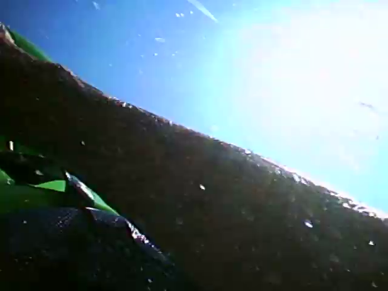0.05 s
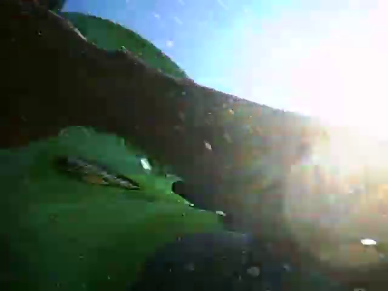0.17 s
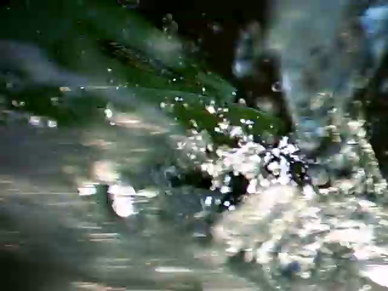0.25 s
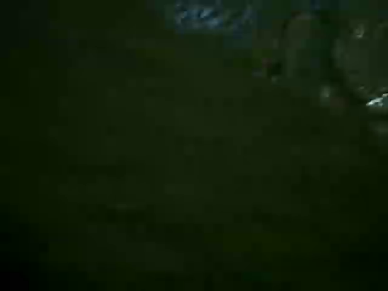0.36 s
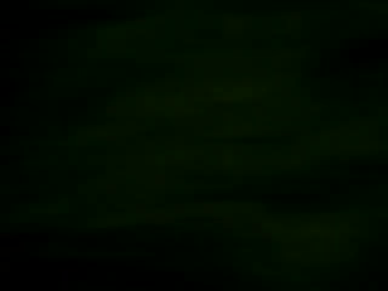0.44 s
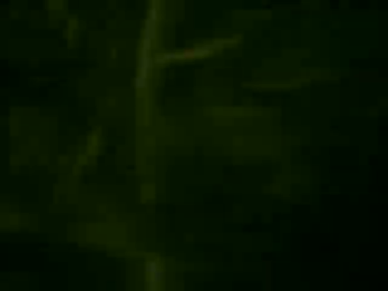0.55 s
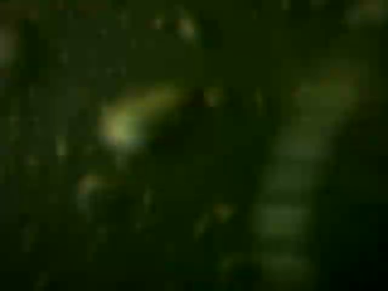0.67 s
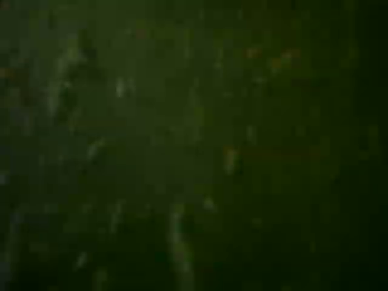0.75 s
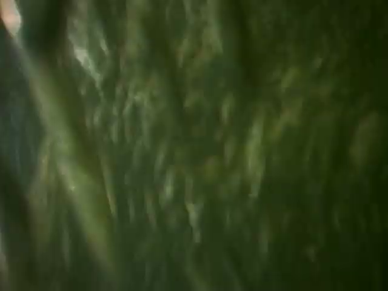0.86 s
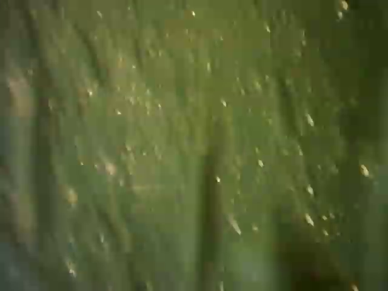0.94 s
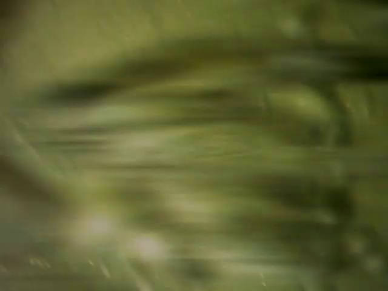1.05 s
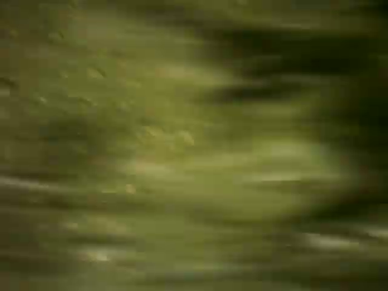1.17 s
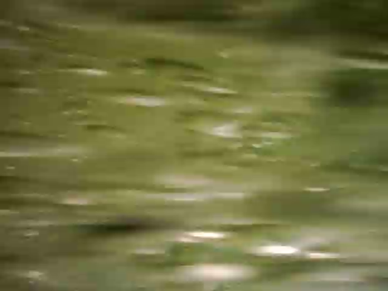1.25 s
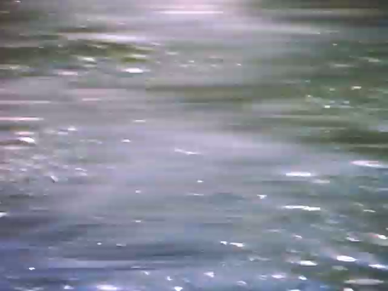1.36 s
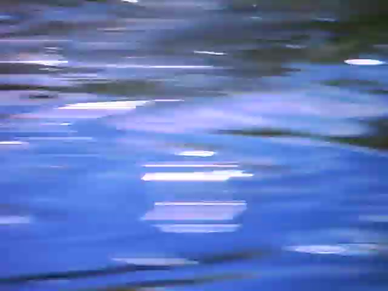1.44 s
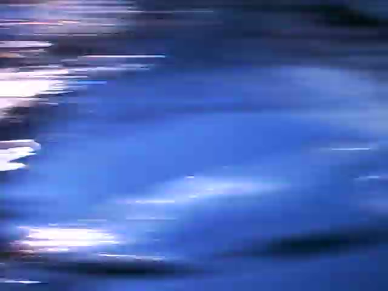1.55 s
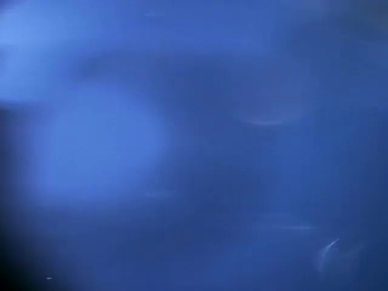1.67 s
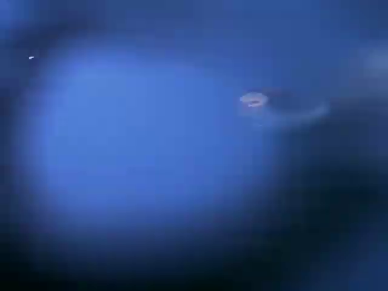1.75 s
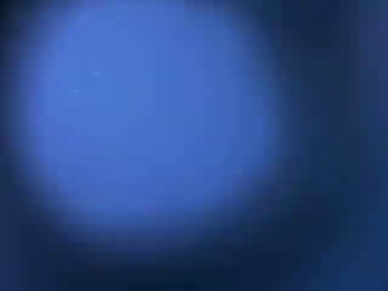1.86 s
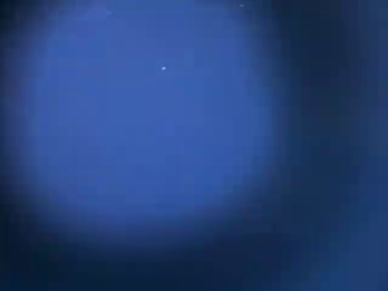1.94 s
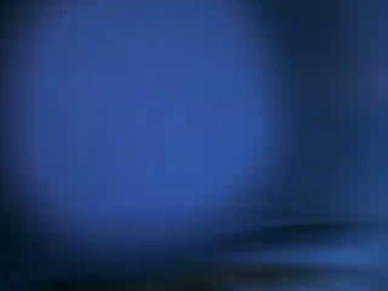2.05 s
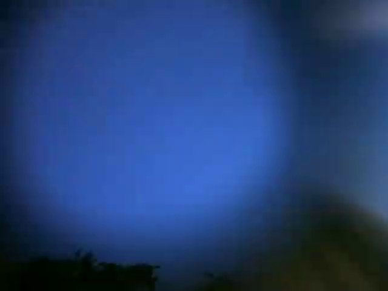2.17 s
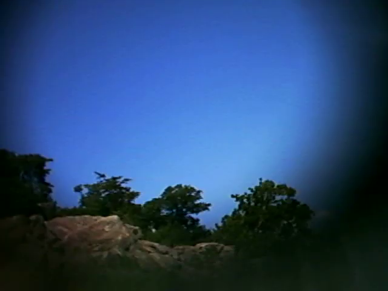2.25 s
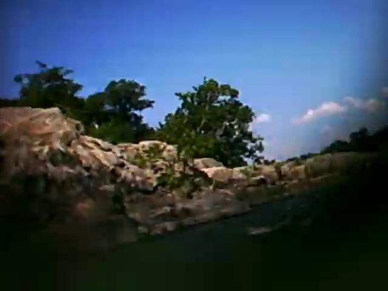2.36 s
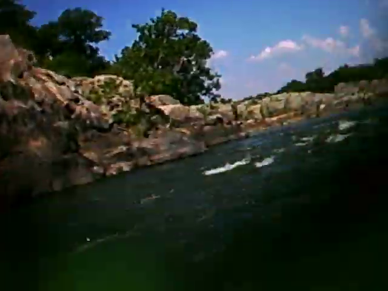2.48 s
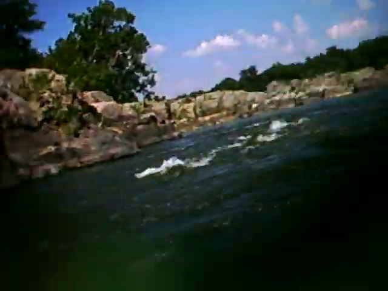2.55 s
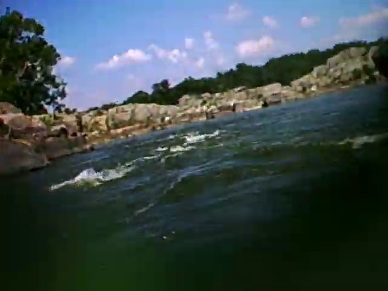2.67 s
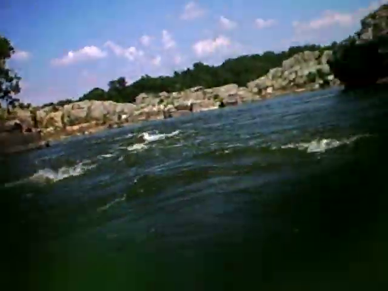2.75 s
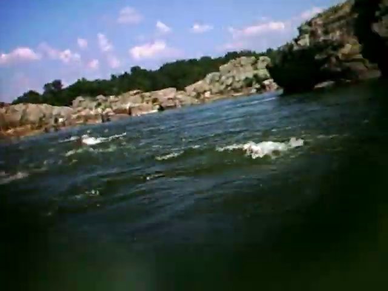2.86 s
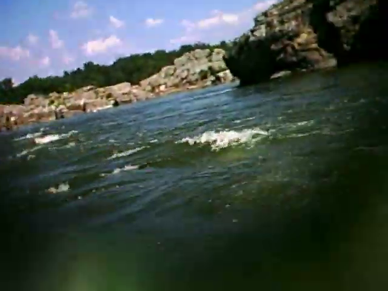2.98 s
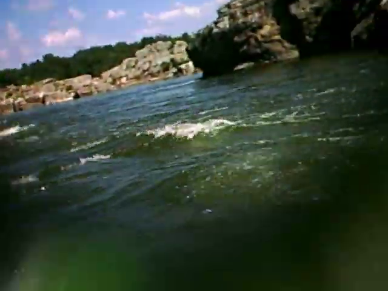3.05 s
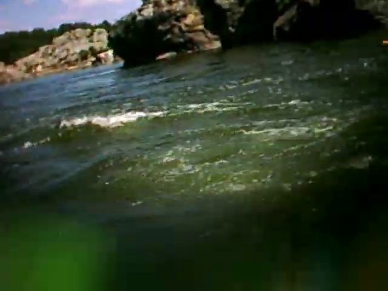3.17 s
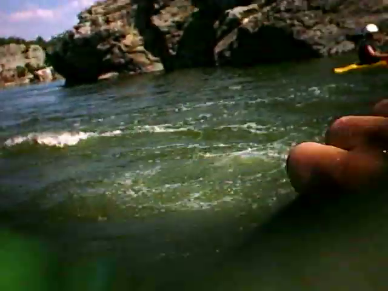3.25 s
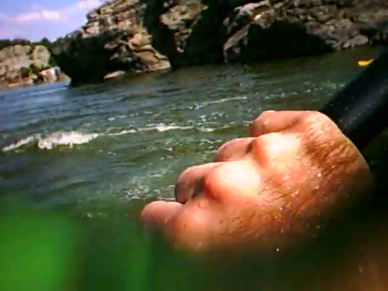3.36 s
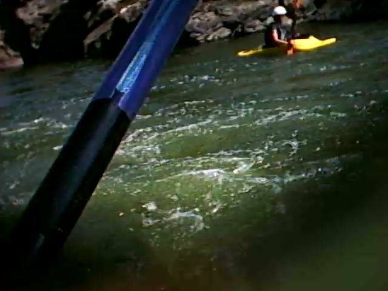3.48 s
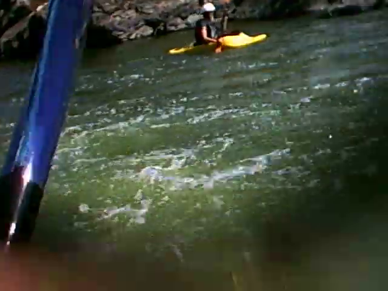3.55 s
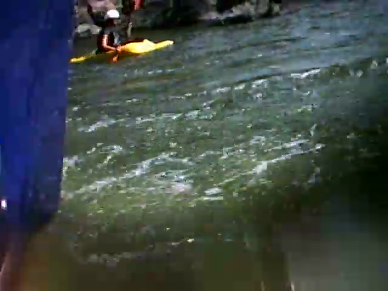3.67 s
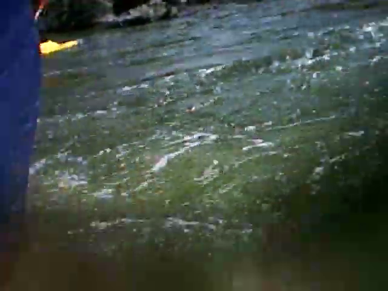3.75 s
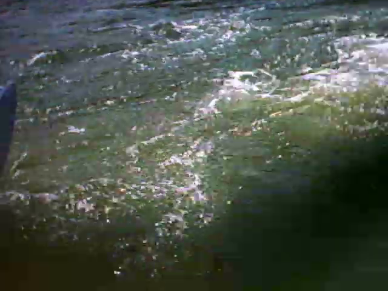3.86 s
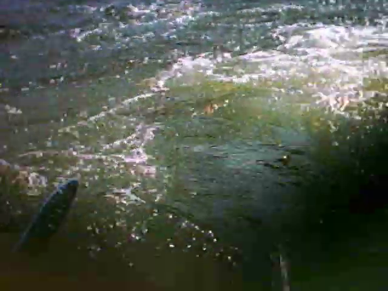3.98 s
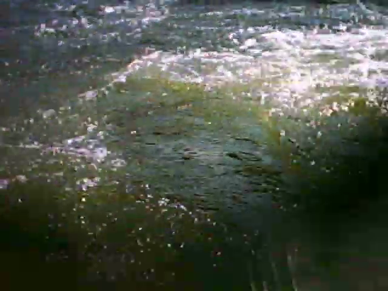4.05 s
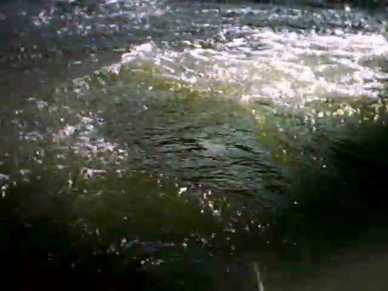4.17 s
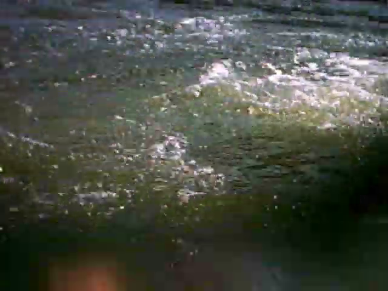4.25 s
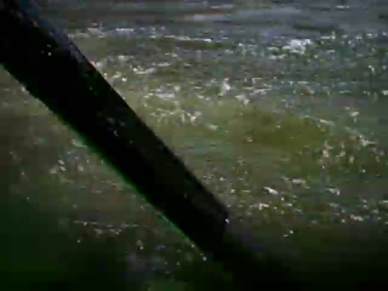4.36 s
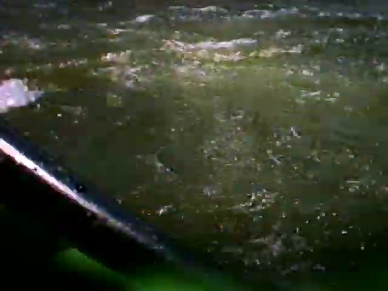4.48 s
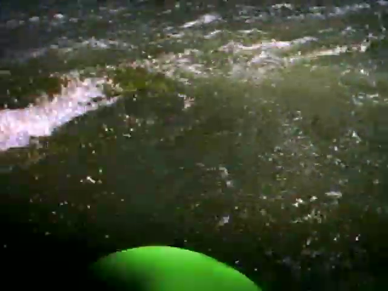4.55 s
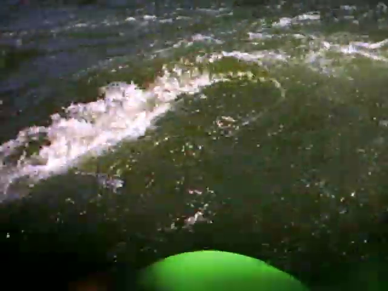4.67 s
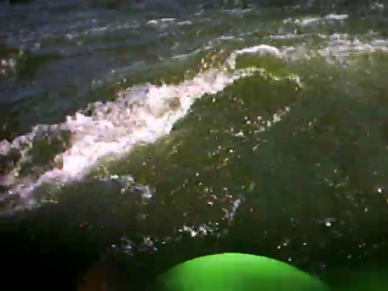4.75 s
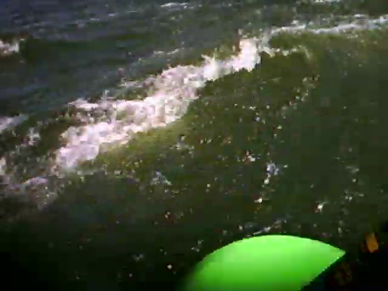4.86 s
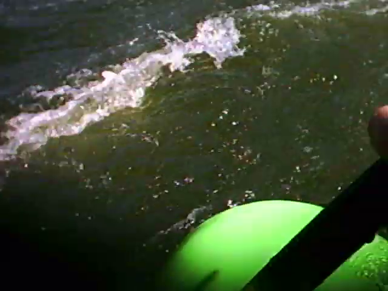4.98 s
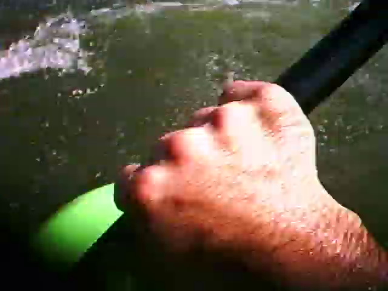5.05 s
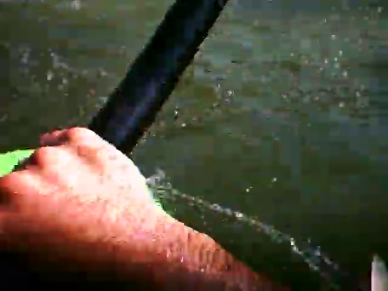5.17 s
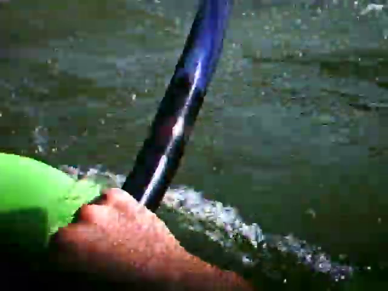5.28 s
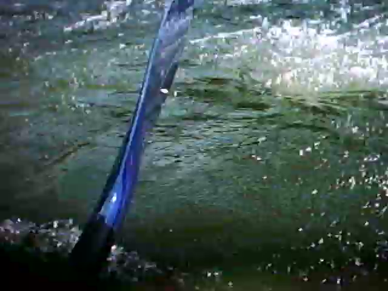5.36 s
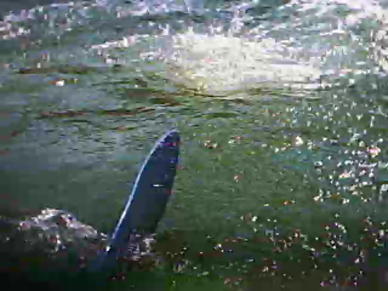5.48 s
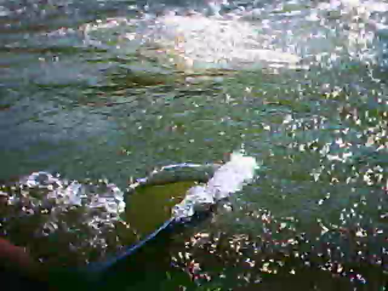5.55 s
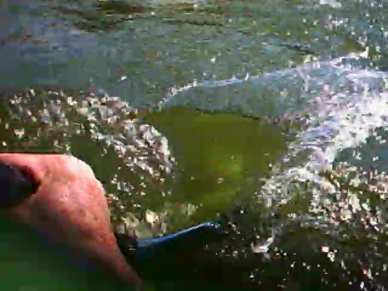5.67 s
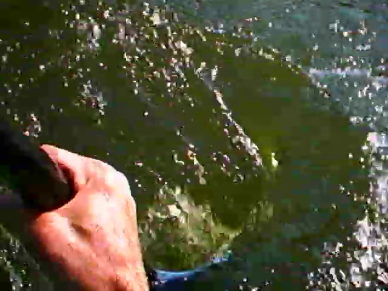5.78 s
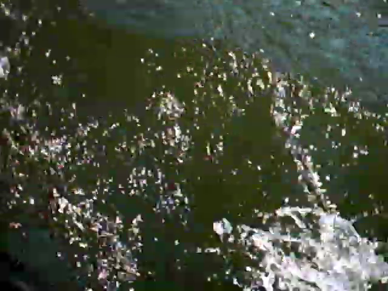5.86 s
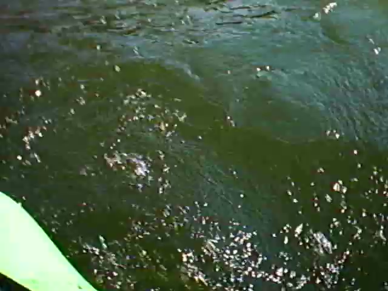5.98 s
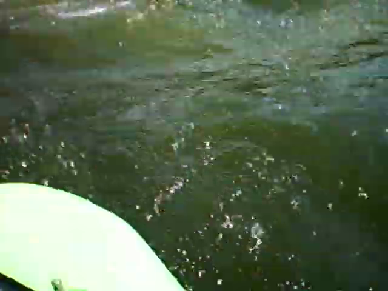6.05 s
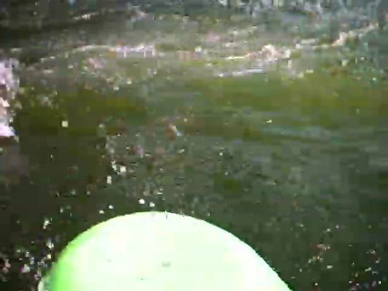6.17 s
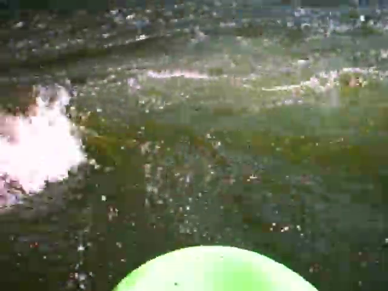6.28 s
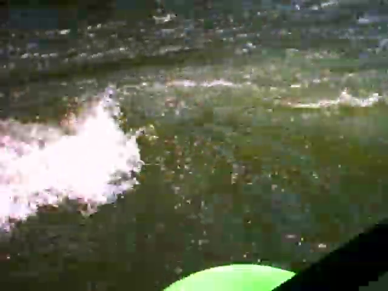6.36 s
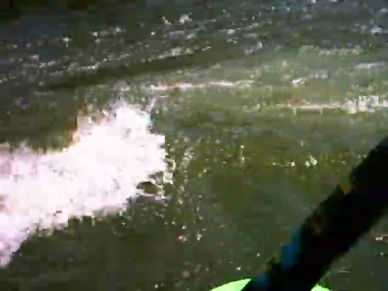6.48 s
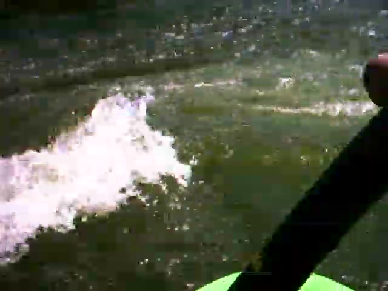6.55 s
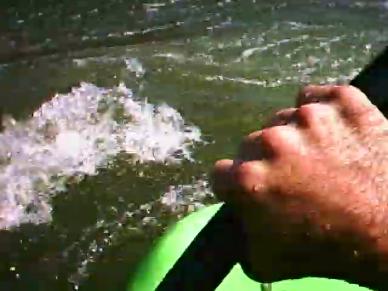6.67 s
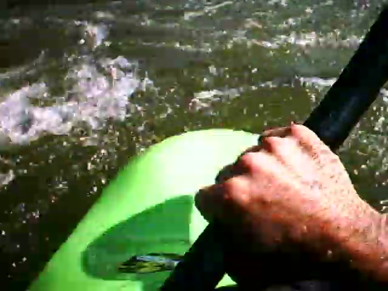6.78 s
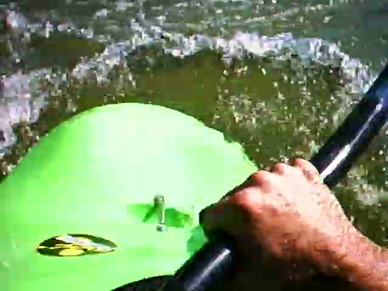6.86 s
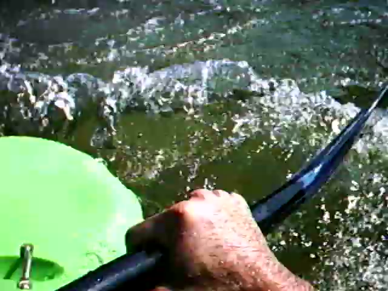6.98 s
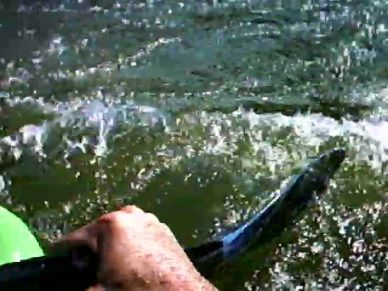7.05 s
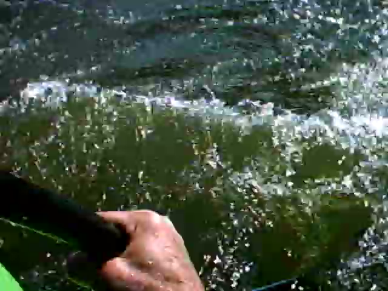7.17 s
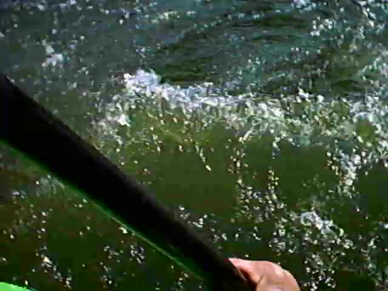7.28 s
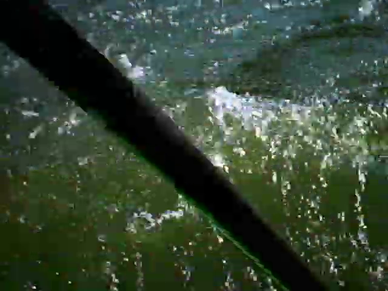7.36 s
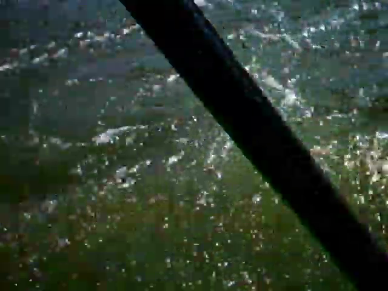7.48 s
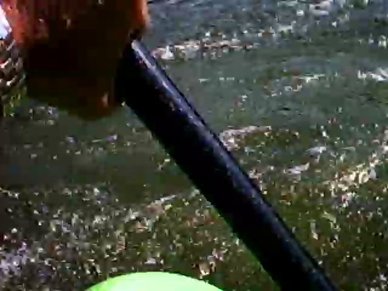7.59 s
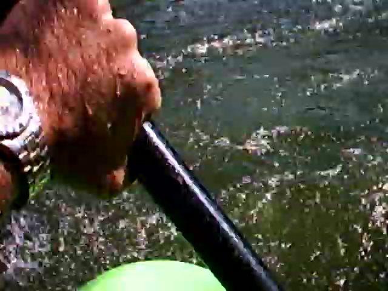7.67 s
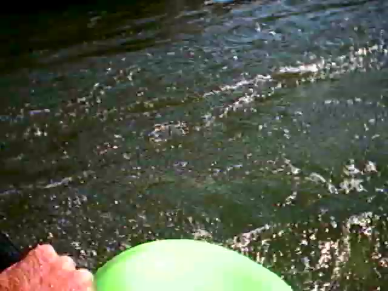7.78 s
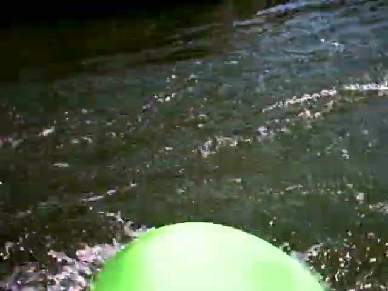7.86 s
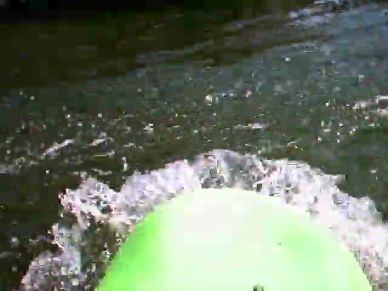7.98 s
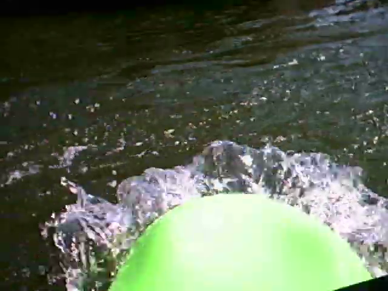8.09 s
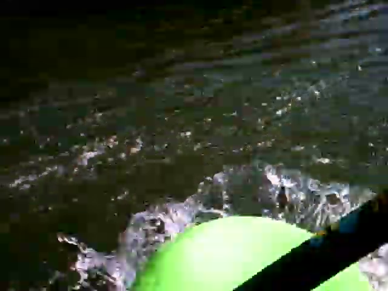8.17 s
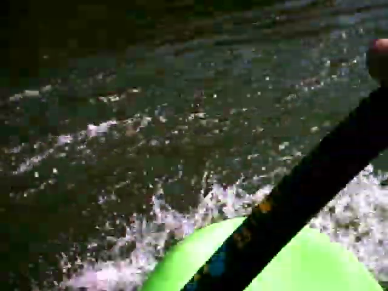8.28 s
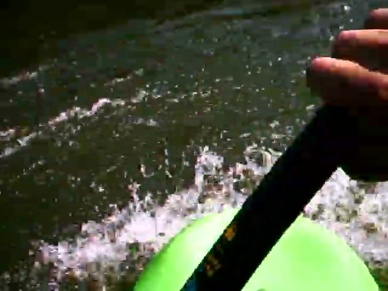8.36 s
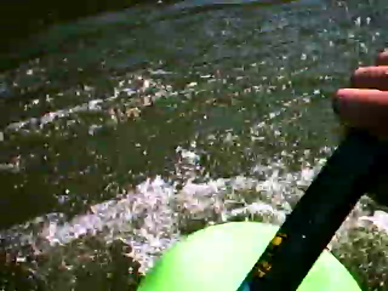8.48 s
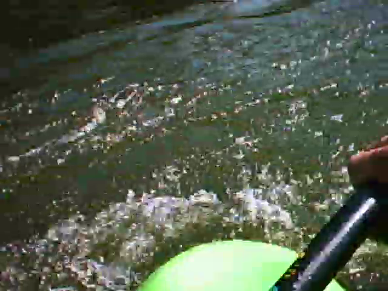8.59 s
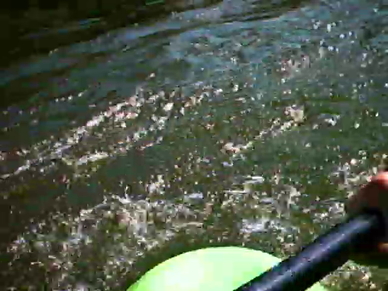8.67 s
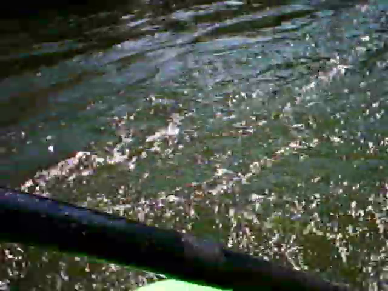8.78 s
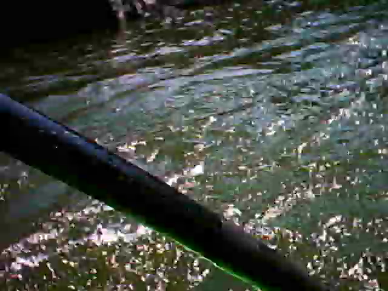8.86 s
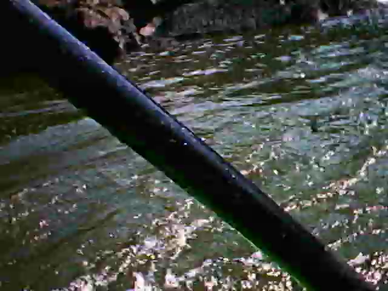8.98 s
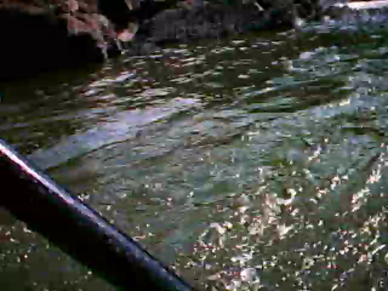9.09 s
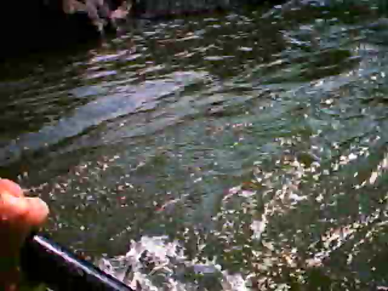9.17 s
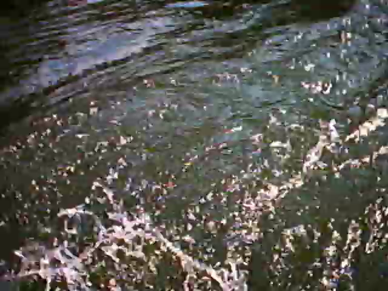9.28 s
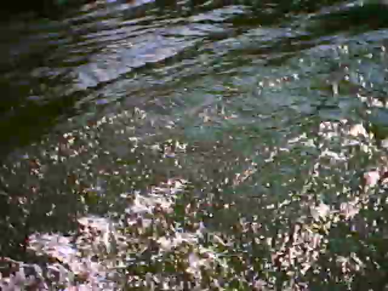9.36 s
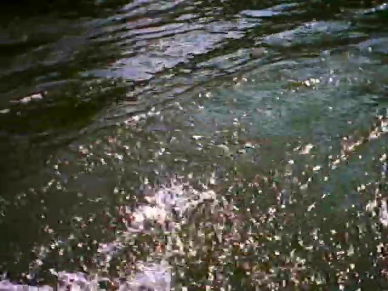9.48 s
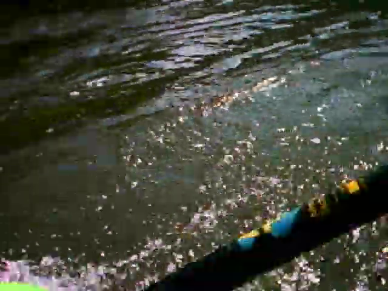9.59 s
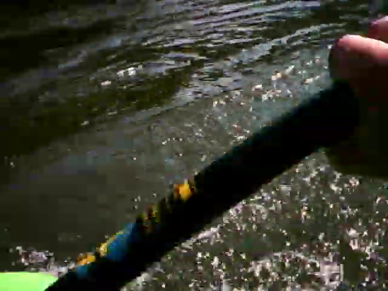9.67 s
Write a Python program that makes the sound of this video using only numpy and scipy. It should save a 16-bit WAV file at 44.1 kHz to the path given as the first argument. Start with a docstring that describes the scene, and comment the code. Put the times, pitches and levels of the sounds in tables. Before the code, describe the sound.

Overloaded underwater churning and gulping bubbles for under two seconds, a fading run-off, then faint rapids, light splashes, dull bumps and low wind.

```python
"""A river rapid, heard from a small camera in a waterproof housing on a kayak's paddler.
A wave breaks over the camera: crowds of ringing bubbles, gulping pockets and low pressure lumps overload
the narrow-band recorder. The water drains off in a fading rush. Then the river, bands of flickering noise
and bubble fizz, goes on with splashes of ringing bubbles, thumps and a drop of dying sines,
low-noise wind and a gurgle along the bow."""
import sys
import numpy as np
from scipy import signal
from scipy.io import wavfile

SR = 44100
rng = np.random.default_rng(int(sys.argv[2]) if len(sys.argv) > 2 else 0)


def master_out(mix):
    """Clip the mix to full scale and print it as 16-bit PCM to the path in sys.argv[1]."""
    frames = np.transpose(np.atleast_2d(mix))
    ceiling = np.clip(frames, -1, 1)
    pcm = np.round(ceiling * 32767).astype(np.int16)
    wavfile.write(sys.argv[1], SR, pcm)


N = 429093

# Masses of water hitting the case: the crest, the plunge, surfacing, two last slaps.
# Each row: start of full force, rise, hold and fade in seconds,
# churn level in dB, froth level in dB (both before their mix trims).
WATER_SURGES = [(.29, .065, .037, 0.32, -14, -11), (0.489, 0.18, .215, 0.57, -10, -16.5),
                (1.35, .21, .13, 0.3, -9.5, -11), (1.598, .24, 0.024, 0.061, -12.5, -13),
                (1.682, .05, 0.012, 0.08, -16.5, -16.5)]
DRAIN_S = 1.718   # water starts to run off the case


def from_db(db):
    """Decibels to gain."""
    return 10 ** (np.asarray(db) / 20)


def rms_one(x):
    """Scale to unit power."""
    return x / np.sqrt(np.mean(x ** 2) + 1e-20)


def at_hz(points, hz):
    """Read a spectrum's level in dB on a log-frequency axis."""
    table_hz, table_db = np.array(points).T
    return np.interp(np.log(hz), np.log(table_hz), table_db)


def drift(rate_hz):
    """Smooth random wander of rms 1: noise through two equal low-pass poles at the given rate."""
    step = 40   # samples between the points of the slow curve
    r = np.exp(-2 * np.pi * rate_hz * step / SR)
    noise = rng.standard_normal(N // step + 2002)
    slow = signal.lfilter([1], [1, -2 * r, r * r], noise)[2000:]   # skip the filter's start-up
    return np.interp(np.arange(N) / step, np.arange(len(slow)), rms_one(slow))


def surge(s, rise, hold, fade):
    """Attack, hold, release as a gain; rise and fade are the seconds taken for 20 dB."""
    t = np.arange(N) / SR - s
    before = np.maximum(-t / rise, 0)
    after = np.maximum((t - hold) / fade, 0)
    return from_db(-20 * np.minimum(before + after, 10))


def swells(rows, steady_db=-120):
    """Bell-shaped swells add their power to a steady level; a gain per sample."""
    t = np.arange(N) / SR
    power = from_db(steady_db) ** 2
    for s, db, width in rows:
        power = power + from_db(db) ** 2 / (1 + ((t - s) / width) ** 2 / 2) ** 4
    return np.sqrt(power)


def add(out, s, sound):
    """Mix a short sound in at a time in seconds."""
    start = max(round(s * SR), 0)
    out[start:start + len(sound)] += sound[:N - start]


def ping(hz, t60, glide=0.0, swell=0.0):
    """A dying sine; it builds up over `swell` cycles, and its pitch rises by the share `glide` in t60."""
    t = np.arange(int(1.5 * t60 * SR)) / SR
    onset = 1 - np.exp(-t * hz / max(swell, 1e-3))
    decay = from_db(-60 * t / t60)
    cycles = hz * t * (1 + glide * t / t60 / 2)
    return onset * decay * np.sin(2 * np.pi * cycles)


def turbulence(spectrum, patchy_db, flicker, count):
    """Bands of noise, each flickering on its own at about `flicker` Hz; rms 1."""
    edges = np.geomspace(spectrum[0][0], spectrum[-1][0], count + 1)
    white, out = rng.standard_normal((2, N)), 0
    for k, (low, high) in enumerate(zip(edges, edges[1:])):
        band_pass = signal.butter(2, [low, high], "band", fs=SR, output="sos")
        band = signal.sosfilt(band_pass, white[k % 2])   # neighbouring bands use separate noises
        level_db = at_hz(spectrum, np.sqrt(low * high)) + patchy_db * drift(flicker)
        out = out + band * from_db(level_db)
    return rms_one(out)


def bubbles(spectrum, per_s, cycles, spread_db, count):
    """Random-sized bubbles excite resonators that die 60 dB in `cycles`; power holds steady at any rate."""
    out, odds = 0, np.broadcast_to(per_s / count / SR, N)
    for hz in np.geomspace(spectrum[0][0], spectrum[-1][0], count):
        draw = rng.random(N) / odds
        born = np.flatnonzero(draw < 1)
        size = from_db(spread_db * np.minimum(-np.log(draw[born]), 3))
        kicks = np.full(N, 1e-18)
        kicks[born] = size * (-1) ** born / np.sqrt(odds[born])   # rarer bubbles ring louder
        r, w = from_db(-60 * hz / (cycles * SR)), 2 * np.pi * hz / SR
        rings = signal.lfilter([1, 0, -1], [1, -2 * r * np.cos(w), r * r], kicks)
        out = out + rms_one(rings) * np.sqrt(hz) * from_db(at_hz(spectrum, hz))
    return rms_one(out)


def housing(x):
    """The closed plastic case colours sound passing through it with resonant peaks and dips."""
    # Each row: centre in Hz, nominal width in Hz, boost or cut in dB.
    resonances = [(412, 90, 2), (675, 50, 4), (1057, 69, 9.5), (1430, 220, 3), (1670, 140, -2.5),
                  (1900, 400, -6), (2250, 110, 2.5)]
    for hz, width_hz, db in resonances:
        b, a = signal.iirpeak(hz, hz / (width_hz * from_db(-db / 2)), fs=SR)
        x = x + (from_db(db) - 1) * signal.lfilter(b, a, x)
    return x


def river():
    """A noise rush and bubble fizz; whitecaps and the run-off swell all but the steady bass."""
    # Spectrum of the rapid. Each row: frequency in Hz, relative level in dB per Hz.
    rush_spectrum = [(55, 2.5), (110, 2), (200, -2), (330, -5), (480, -2), (750, -4), (1200, 0),
                     (2000, 0.5), (3000, -2.5), (3500, -3), (4200, -7.5)]
    # Whitecaps passing the boat. Each row: nearest moment in seconds, level in dB, half width in seconds.
    whitecaps = [(.2, -40.5, .2), (2.75, -60.5, 0.13), (4.7, -59.5, .15), (5.35, -56, 0.56),
                 (6.1, -64, 0.28), (6.53, -57, .08), (7.05, -55.5, 0.087), (7.8, -60, 0.074),
                 (8.55, -56, 0.35), (8.89, -53.5, 0.058), (9.55, -54.5, 0.55)]
    river_db, bass_db, bass_top_hz = -58, -57, 230
    drain_db, drain_hold_s, drain_fade_s = -39.5, .067, .59
    rush = turbulence(rush_spectrum, patchy_db=1.2, flicker=9, count=13)
    fizz = bubbles(rush_spectrum, per_s=1300, cycles=8.7, spread_db=6.5, count=24)
    water = from_db(-1.0) * rush + from_db(-6.0) * fizz
    bass = signal.sosfilt(signal.butter(1, bass_top_hz, fs=SR, output="sos"), water)
    run_off = from_db(drain_db) * surge(DRAIN_S, rise=.037, hold=drain_hold_s, fade=drain_fade_s)
    level = np.hypot(swells(whitecaps, river_db), run_off)
    lapping = from_db(.4 * drift(5))
    return lapping * (level * (water - bass) + from_db(bass_db) * bass)


def wind():
    """Low, lumpy pressure of air on the case: flickering noise under a steady breeze with gusts."""
    # Each row: frequency in Hz, relative level in dB per Hz ahead of the low-pass.
    gust_spectrum = [(18, 10), (32, -0.5), (50, -12.5), (80, -19), (130, -25.5)]
    # Each row: peak time in seconds, level in dB, half width in seconds.
    gusts = [(2.4, -52, 0.087), (3.75, -55.5, 0.52), (4.4, -51.5, .06), (5.2, -50, .16), (6.1, -50.5, .08),
             (6.85, -51.5, 0.15), (7.8, -57, 0.72), (9.13, -52, 0.18)]
    breeze_db = -62.5
    air = turbulence(gust_spectrum, patchy_db=-0.5, flicker=6.5, count=4)
    lumps = signal.sosfilt(signal.butter(2, 75, fs=SR, output="sos"), air)
    return swells(gusts, breeze_db) * lumps


def hull():
    """Water gurgles along the hollow bow as it pushes through a wave: low ringing bubbles in swells."""
    # Each row: frequency in Hz, relative level in dB per Hz.
    gurgle_spectrum = [(180, -3.5), (260, 1), (370, -6)]
    # Each row: peak time in seconds, level in dB, half width in seconds.
    bow_wave = [(8.49, -63, .06), (8.72, -63, 0.083)]
    return swells(bow_wave) * bubbles(gurgle_spectrum, per_s=250, cycles=20, spread_db=0.5, count=10)


def splashes():
    """Paddle blade and bow throw up clouds of bubbles that swell quickly and die away."""
    # Each row: start in seconds, level in dB before the mix trim, length in seconds (peak at a third).
    splash_rows = [(0.044, -30.5, 0.029), (5.42, -47, 0.013), (5.732, -44, 0.023), (5.793, -42, .017),
                   (5.876, -47, 0.028), (5.918, -46, 0.02), (5.968, -53, 0.093), (6.908, -53, 0.14),
                   (7.048, -54, 0.078), (7.759, -56, .03), (7.97, -51, .02), (8.273, -52.5, 0.016),
                   (8.345, -53, 0.028), (8.871, -53, 0.026), (8.963, -49.5, .018), (9.291, -51, 0.07)]
    # Each row: frequency in Hz, relative level in dB per Hz.
    splash_spectrum = [(250, -3.5), (450, -3), (700, 0), (1150, 5), (1700, -6), (3500, -11)]
    t, cloud = np.arange(SR) / SR, np.zeros(N)
    for s, db, length in splash_rows:
        age = 3 * t / length
        add(cloud, s, from_db(db) * age * np.exp(1 - age))
    spray = bubbles(splash_spectrum, per_s=600, cycles=67, spread_db=4.0, count=22)
    return from_db(-5.0) * cloud * spray


def knocks():
    """Dull bumps of water, boat and paddle are low dying sines; a drop rings the case's own modes."""
    # Each row: start in seconds, level in dB, pitch in Hz, time to fall 60 dB in seconds.
    thumps = [(0.043, -27.5, 118, 0.07), (0.035, -29.5, 34, 0.48), (1.7, -11, 48.4, 0.098),
              (1.903, -39.5, 162.5, 0.19), (2.377, -38.5, 45.54, 0.31), (3.199, -44, 120.8, 0.1),
              (4.355, -40.5, 91.8, 0.065), (5.806, -20.5, 25.6, 0.16), (5.803, -35, 69, 0.11),
              (5.916, -41.5, 96, 0.053), (6.98, -46, 77.6, .18)]
    # A drop hits the case: start in seconds, level in dB.
    drop_s, drop_db = (2.4285, -32.5)
    # Ringing modes of the case. Each row: pitch in Hz, level in dB relative to the drop,
    # time to fall 60 dB in seconds.
    shell_modes = [(687, -9, 0.075), (1060, 7.5, 0.028), (1240, 10.5, 0.013), (1464, -24, .018),
                   (2160, -4.5, 0.015)]
    out = np.zeros(N)
    for s, db, hz, t60 in thumps:
        add(out, s, from_db(db) * ping(hz, t60, swell=0.22))
    for hz, db, t60 in shell_modes:
        add(out, drop_s, from_db(drop_db + db) * ping(hz, t60, swell=0.54))
    return out


def small_gulps():
    """Lesser air pockets ring at random from the first surge to the last, each for as many cycles."""
    per_s, cycles = 16, 30
    mean_db, spread_db, low_hz, high_hz = -23.5, 3.5, 650, 3500
    first, last = WATER_SURGES[0][0], WATER_SURGES[-1][0]
    out = np.zeros(N)
    for when, pitch, size in rng.random((int(per_s * (last - first)), 3)):
        hz = low_hz * (high_hz / low_hz) ** pitch
        db = mean_db + spread_db * (2 * size - 1)
        add(out, first + when * (last - first), from_db(db) * ping(hz, cycles / hz, glide=.1, swell=.7))
    return out


def gulps():
    """A large air pocket pinches off and rings against the case; three smaller pieces ring around it."""
    # Each row: start in seconds, level in dB, pitch in Hz, time to fall 60 dB in seconds.
    pockets = [(.266, -11.5, 3000, .007), (.316, -6.5, 2150, 0.03), (0.348, 4.5, 1524, .016),
               (0.47, 1.5, 1164, 0.031), (0.494, -3, 1360, 0.058), (.504, -3, 2395, .043),
               (.669, -6.5, 935, 0.042), (.695, -10, 885, 0.13), (.708, 4.5, 670, 0.044),
               (.754, -4.5, 1550, 0.016), (.786, -3, 630, 0.079), (.811, -10, 2705, .021),
               (0.849, 0.5, 1555, 0.035), (0.872, -11, 1253, .13), (.892, 2, 937, .06),
               (0.92, 3, 1205, 0.038), (.947, 0.5, 700, 0.023), (.988, 3.5, 826, 0.057),
               (1.056, -21, 1380, 0.06), (1.097, -10, 2204, 0.026), (1.101, -3.5, 935, 0.042),
               (1.154, -0.5, 2803, 0.0087), (1.173, 3, 1330, 0.014), (1.187, -4.5, 3620, 0.0062),
               (1.216, 0, 730, 0.018), (1.216, -8, 2390, 0.013), (1.267, -4.5, 640, 0.077),
               (1.281, -8, 3520, .02), (1.296, -4, 1323, .06), (1.597, -3.5, 1386, 0.081),
               (1.62, 0, 1300, .03), (1.671, 6, 1795, .008), (1.691, -2.5, 2720, 0.0096),
               (1.696, -10, 650, 0.057), (1.706, 4, 1105, 0.014), (1.838, -24.5, 377, .055)]
    out = np.zeros(N)
    pieces = rng.random((len(pockets), 3, 2))
    for (s, db, hz, t60), draws in zip(pockets, pieces):
        add(out, s, from_db(db) * ping(hz, t60, glide=0.063, swell=0.96))
        for when, pitch in draws:
            piece = ping(hz * (.8 + .6 * pitch), .6 * t60, glide=0.14, swell=0.41)
            add(out, s + t60 * (.3 * when - .05), from_db(db - 8.5) * piece)
    return out


def wave():
    """Water tumbles on the case: big bubbles, fine froth, pressure lumps; harder churning makes more bubbles."""
    # Three spectra. Each row: frequency in Hz, relative level in dB per Hz.
    churn_spectrum = [(200, -4), (400, -7.5), (700, -3.5), (900, -0.5), (1070, -4.5), (1300, -1),
                      (1700, -9)]
    froth_spectrum = [(1700, 6.5), (2000, 6), (2300, -0.5), (3000, -4), (3600, -3), (4200, -0.5)]
    buffet_spectrum = [(22, 0), (40, 0.5), (70, -2.5), (130, -5.5), (200, -12)]
    # Slugs of water shoving the case. Each row: peak time in seconds, level in dB, half width in seconds.
    shoves = [(.292, -10.5, 0.02), (.59, -10.5, 0.081), (.77, -14.5, 0.029), (1.225, -23.5, .025),
              (1.335, -15.5, 0.047), (1.58, -24.5, 0.094), (1.71, -31.5, 0.028)]
    submerged_db = -32.5   # buffeting between the shoves
    wet_s = .268   # the wave closes over the case
    froth_fade = 0.6   # share of the churn's fade time
    churn_gain = froth_gain = 0
    for s, rise, hold, fade, churn_db, froth_db in WATER_SURGES:
        churn_gain = np.maximum(churn_gain, from_db(churn_db) * surge(s, rise, hold, fade))
        froth_gain = np.maximum(froth_gain, from_db(froth_db) * surge(s, rise, hold, fade * froth_fade))
    churn = bubbles(churn_spectrum, per_s=350 + 9000 * churn_gain, cycles=23, spread_db=4.0, count=30)
    froth = bubbles(froth_spectrum, per_s=180 + 11000 * froth_gain, cycles=26, spread_db=4.5, count=20)
    buffet = turbulence(buffet_spectrum, patchy_db=3.0, flicker=75, count=5)
    lumps = from_db(.5 * drift(60))
    wet = surge(wet_s, rise=.014, hold=DRAIN_S - wet_s, fade=0.19)
    water = from_db(-2.4) * churn_gain * churn
    water = water + from_db(0.42) * froth_gain * froth
    water = water + swells(shoves, submerged_db) * buffet
    return lumps * wet * water


def scene():
    """Wave, river, splashes and bow pass through the case; gulps, knocks and wind act on it directly."""
    through_case = housing(wave() + river() + splashes() + hull())
    on_case = gulps() + knocks() + wind() + small_gulps()
    return (through_case + on_case)[None]


def record(dry):
    """A slowly sampled narrow band overloads; smoothed back, peaks beyond full scale clip and crackle."""
    band_hz, low_cut_hz, slow_rate_hz, cutoff_hz = 3793, 5.7, 8000, 15600
    overload, full_scale = 0.7, 0.69   # amplitudes
    coupled = signal.sosfilt(signal.butter(1, low_cut_hz, "high", fs=SR, output="sos"), dry)
    narrow = signal.sosfilt(signal.butter(12, band_hz, fs=SR, output="sos"), coupled)
    slow = signal.resample_poly(narrow, slow_rate_hz, SR, axis=-1)
    driven = slow / (1 + (slow / overload) ** 6) ** (1 / 6)   # soft limit
    smooth = signal.resample_poly(driven, SR, slow_rate_hz, axis=-1)[:, :N]
    smoother = signal.firwin(301, 4350, window=("kaiser", 9), fs=SR)
    smooth = signal.fftconvolve(smooth, smoother[None], "same", axes=-1)
    clipped = np.clip(smooth, -full_scale, full_scale)
    return signal.sosfilt(signal.ellip(10, .1, 80, cutoff_hz, fs=SR, output="sos"), clipped)


dry = scene()
out = record(dry)
master_out(out)
```